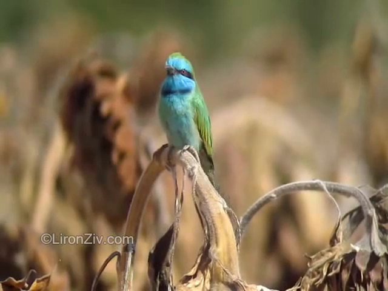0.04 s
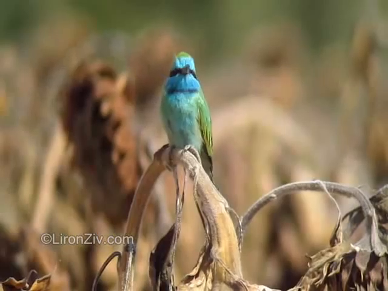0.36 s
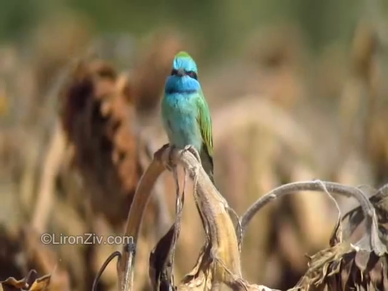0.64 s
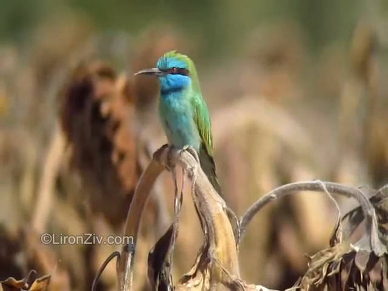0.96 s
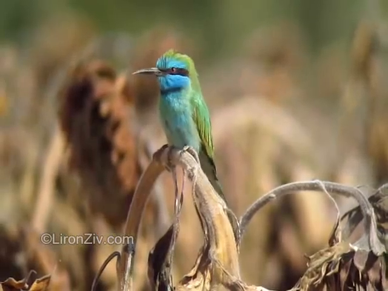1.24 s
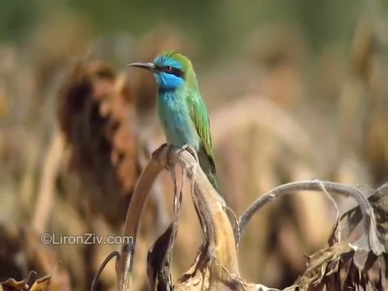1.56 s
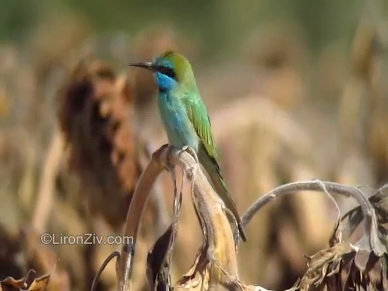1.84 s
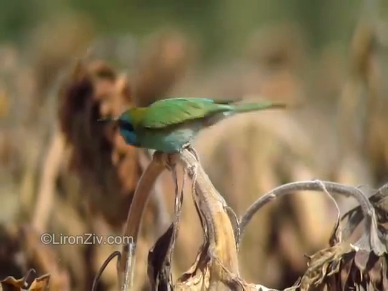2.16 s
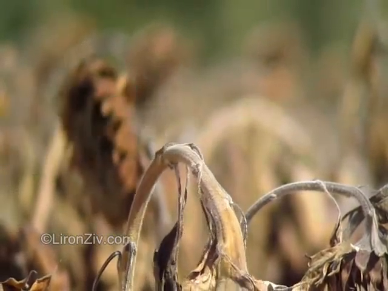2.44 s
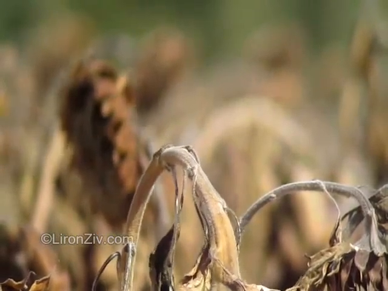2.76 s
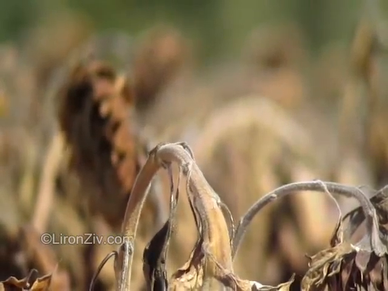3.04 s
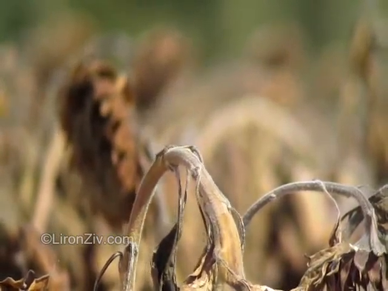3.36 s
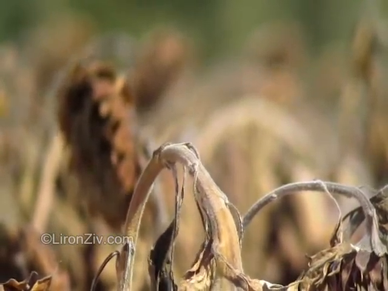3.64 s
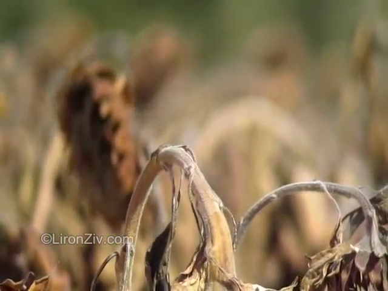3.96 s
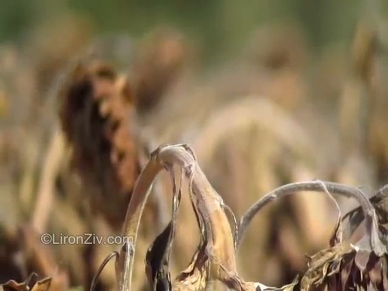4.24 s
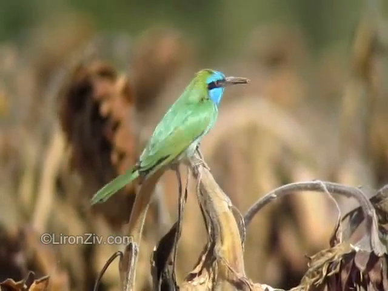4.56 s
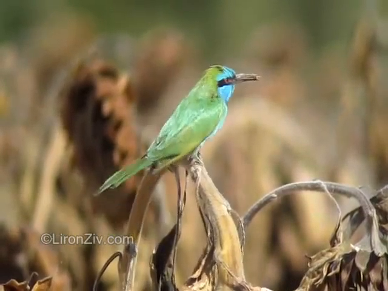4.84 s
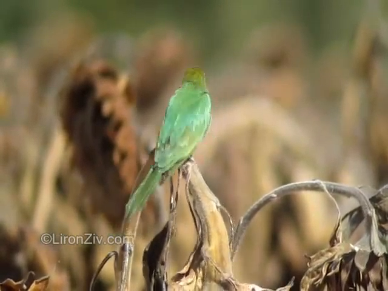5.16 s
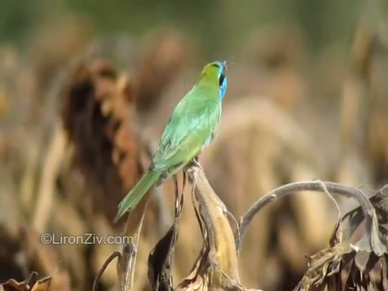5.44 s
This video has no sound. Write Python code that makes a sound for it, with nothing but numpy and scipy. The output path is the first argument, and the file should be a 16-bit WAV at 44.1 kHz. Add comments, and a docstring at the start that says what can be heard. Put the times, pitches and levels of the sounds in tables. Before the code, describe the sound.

Gusty low wind rumble and soft thumps in an open field, with one short bump and three faint small-bird chirps.

```python
"""Gusts of low thumps over a rumble: a breeze in a dry field sweeps eddies across a camera's microphone.
Each eddy is a pressure push and a suction, and the hardest one overloads the input.
A small bird in flight chirps three times and there is one tiny dry tick, both scattered by the stalks.
Behind them lie the broadband hiss of the field and the camera's faint whine."""
import sys
import numpy as np
from scipy import signal
from scipy.fft import rfft, irfft
from scipy.io import wavfile

SR = 44100
rng = np.random.default_rng(int(sys.argv[2]) if len(sys.argv) > 2 else 0)


def unload_wav(signal):
    """Save mono or channel-first audio to the path in sys.argv[1] as 16-bit WAV at rate SR, clipped to [-1, 1]."""
    wavfile.write(
        sys.argv[1],
        SR,
        np.round(np.clip(np.atleast_2d(signal).T, -1, 1) * 32767).astype(np.int16),
    )


N = 242550
TIME = np.arange(N) / SR


def wind(rumble_db=-4.0, rasp_db=-28):
    """Turbulent pressure: rumble and flutter follow the breeze; strong eddies break up into a fine rasp."""
    # the strongest eddies; small fast ones sound higher: (time [s], level [dB], frequency [Hz])
    eddies = [(0.043, -14, 200), (0.133, -9.5, 130), (0.151, -11, 169), (0.16, -6, 187), (0.224, -11, 115),
              (0.296, -16.5, 267), (0.306, -10.5, 149), (0.319, -9.5, 149), (0.3267, 2, 307),
              (0.331, -31, 182), (0.428, -9, 143), (0.515, -4.5, 167), (0.762, -13, 116), (0.922, -13, 115),
              (0.996, -8, 128), (1.059, -8.5, 103), (1.115, -15, 147), (1.241, -14.5, 93),
              (1.284, -10, 150), (1.641, -12, 107), (1.69, -6.5, 122), (1.811, -16, 185),
              (2.095, -3.5, 120), (2.103, -6.5, 129), (2.139, -7, 187), (2.16, -4.5, 247),
              (2.188, -10.5, 163), (2.388, -16, 196), (2.416, -13.5, 181), (2.44, -12.5, 169),
              (2.552, -16.5, 137), (2.743, -19, 115), (3.069, -5, 152), (3.101, -8, 177),
              (3.145, -9.5, 187), (3.22, -7, 135), (3.248, -11.5, 175), (3.637, -22.5, 193),
              (4.178, -7, 139), (4.198, -8, 132), (4.215, -12, 114), (4.59, -2.5, 164), (4.639, -13, 143),
              (4.651, -7, 167), (4.703, -5.5, 182), (4.782, -12, 125), (5.223, -11, 78), (5.314, -10, 217),
              (5.337, -10, 154), (5.388, -11, 210), (5.399, -6, 222), (5.409, -3.5, 216),
              (5.445, -6.5, 160)]
    # spectrum of the slow pressure swell: (frequency [Hz], relative level [dB])
    rumble_spectrum = [(8, -20), (22, -13.5), (42, -4), (70, -12), (120, -19.5), (200, -21.5), (400, -61),
                       (900, -90)]
    # spectrum of the fine turbulence inside an eddy: (frequency [Hz], relative level [dB])
    rasp_spectrum = [(120, -7), (270, 0), (450, -6), (650, -18), (1000, -64), (2000, -80)]
    rumble = amp(breeze(TIME) + rumble_db) * noise(rumble_spectrum)
    low_flutter = flutter(260, level_db=4.5, spread_db=8.5, centre_hz=67.4, quickening=0.4, log_spread=0.4)
    mid_flutter = flutter(150, level_db=2, spread_db=6, centre_hz=113.3, quickening=0.28, log_spread=0.47)
    buffets = thumps(eddies, roundness=3.36) + mid_flutter
    buffet_envelope = abs(signal.hilbert(buffets))
    rasp = amp(rasp_db) * buffet_envelope * noise(rasp_spectrum)
    return rumble + low_flutter + buffets + rasp


def thumps(eddies, roundness, lean_rad=2.27, lean_spread_rad=0.52):
    """A passing eddy is a bipolar pressure pulse, push and suction; a rounder pulse has less treble."""
    out = np.zeros(N)
    t = np.arange(-(SR // 20), SR // 20) / SR
    for (s, db, hz), chance in zip(eddies, rng.standard_normal(len(eddies))):
        swing = (1 - 2j * np.pi * hz * t / roundness) ** -roundness  # about one cycle, with no ring
        lopsided = np.exp(1j * (lean_rad + lean_spread_rad * chance))  # the suction is mostly the deeper
        add(out, s + t[0], amp(db) * (swing * lopsided).real)
    return out


def flutter(count, level_db, spread_db, centre_hz, quickening, log_spread):
    """Convection of random eddies: a stronger breeze makes their pulses both louder and quicker."""
    jitter, strength, pace = rng.uniform(-1.01, 1, (count, 3)).T
    times = (np.arange(count) + .5 + jitter / 2) * TIME[-1] / count
    breeze_db = breeze(times)
    db = breeze_db + level_db + spread_db * strength
    hz = centre_hz * amp(quickening * (breeze_db - breeze_db.mean())) * np.exp(log_spread * pace)
    return thumps(np.transpose([times, db, hz]), roundness=3.3)


def breeze(times, build_db_per_s=416, die_db_per_s=360, calm_db=-42.5):
    """Level of the breeze in dB: gusts build, hold and die away, adding in power to nearly calm air."""
    # gusts at the microphone: (time [s], duration [s], level [dB])
    gusts = [(0.0, 0.18, -25), (0.278, 0.35, -26), (0.877, 0.3, -29), (1.237, 0.21, -32.5),
             (1.668, 0.44, -28), (2.076, 0.092, -22.5), (2.365, 0.12, -22.5), (2.648, 0.51, -34),
             (3.068, 0.23, -22), (3.446, 0.17, -27.5), (3.826, 0.032, -30), (4.083, 0.64, -32.5),
             (4.18, 0.046, -21), (4.524, 0.26, -25.5), (5.006, 0.1, -30), (5.124, 0.38, -25)]
    power = amp(calm_db) ** 2
    for start, length, db in gusts:
        before_db = build_db_per_s * np.maximum(start - times, 0)
        after_db = die_db_per_s * np.maximum(times - start - length, 0)
        power = power + amp(db - before_db - after_db) ** 2
    return 10 * np.log10(power)


def bird(gain_db=0.5, warble_depth_hz=170, warble_rate_hz=190, voice_split_hz=3100, fade_db=-6.5):
    """Two voices whistle quick glides; fast frequency modulation makes the lower one rasp."""
    # whistled notes: (time [s], duration [s], first pitch [Hz], last pitch [Hz], relative level [dB])
    notes = [(3.967, 0.0068, 4460, 4300, -30), (3.962, 0.015, 2740, 2620, -41),
             (3.977, 0.0102, 2770, 2730, -32.5), (4.358, 0.028, 2250, 2350, -45),
             (4.376, .018, 2650, 2820, -41), (4.384, .029, 4310, 3180, -41),
             (4.902, 0.018, 2500, 2950, -45), (4.909, 0.011, 4250, 3880, -48)]
    out = np.zeros(N)
    for start, length, first_hz, last_hz, db in notes:
        t = np.arange(0, length, 1 / SR)
        glide_hz = first_hz + (last_hz - first_hz) * t / length
        depth_hz = warble_depth_hz if first_hz < voice_split_hz else 0
        warble_hz = depth_hz * np.sin(2 * np.pi * (warble_rate_hz * t + rng.random()))
        cycles = np.cumsum(glide_hz + warble_hz) / SR
        envelope = signal.windows.tukey(len(t), alpha=.25) * amp(fade_db * t / length)
        add(out, start, amp(db + gain_db) * envelope * np.sin(2 * np.pi * cycles))
    return out


def tick(decay_s=0.00055):
    """A broadband transient: bright noise decays exponentially within a few milliseconds."""
    # the dry snap: (time [s], initial level [dB])
    snaps = [(5.1824, -30.5)]
    # spectrum of the snap: (frequency [Hz], relative level [dB])
    spectrum = [(1000, 14), (2700, 18), (4000, 20), (5200, 21), (8000, -6), (15000, 10)]
    out = np.zeros(N)
    t = np.arange(SR // 50) / SR
    for s, db in snaps:
        add(out, s, amp(db) * noise(spectrum)[:len(t)] * np.exp(-t / decay_s))
    return out


def scatter(direct, wet_db=-15, t60_s=.15):
    """Diffuse scattering: reflections from the stalks add a short, weak tail to the direct sound."""
    t = np.arange(SR // 3) / SR
    tail = rng.standard_normal(len(t)) * amp(-60 * t / t60_s)
    return direct + amp(wet_db) * signal.fftconvolve(direct, tail / np.linalg.norm(tail))[:N]


def field(gain_db=10.0, flicker_db=0.36):
    """Amplitude-modulated noise: the far hiss of the field drifts slowly and flickers slightly."""
    # spectrum of the open field: (frequency [Hz], relative level [dB])
    spectrum = [(20, 6.5), (130, 6.5), (300, 4.5), (450, 2), (680, 0), (930, 0), (1350, -4), (2800, -7.5),
                (5000, -11), (6900, -12), (7700, -15), (11000, -18.5), (15000, -24.5)]
    # drift of the hiss: (time [s], relative level [dB])
    drift = [(0, -57), (0.4, -56.5), (0.7, -54.5), (1.5, -53.5), (2.5, -55.5), (2.9, -53), (3.3, -55.5),
             (4.05, -53.5), (4.7, -55.5), (5.1, -54), (5.5, -56.5)]
    drift_db = np.interp(TIME, *np.transpose(drift))
    return amp(drift_db + gain_db + flicker_db * wander(rate_hz=16)) * noise(spectrum)


def whine(waver_rad=0.98):
    """Slow phase modulation makes the camera's thin pure tones waver slightly."""
    # tones of the camera: (frequency [Hz], rms level [dB])
    tones = [(1207, -66.5), (1704, -68.5), (6306.5, -73.5), (6803, -75)]
    out = np.zeros(N)
    for hz, db in tones:
        phase = 2 * np.pi * hz * TIME + waver_rad * wander(rate_hz=2.4)
        out += amp(db) * np.sqrt(2) * np.sin(phase)
    return out


def noise(spectrum):
    """Spectral shaping of white noise by rows (frequency [Hz], relative level [dB]), at rms 1."""
    hz, db = np.transpose(spectrum)
    bins = np.fft.rfftfreq(N, 1 / SR)
    gain = amp(np.interp(np.log(bins + 1), np.log(hz), db))
    return unit(irfft(rfft(rng.standard_normal(N)) * gain, N))


def wander(rate_hz):
    """Low-passed noise of rms 1: a smooth random fluctuation at about the given rate."""
    bins = np.fft.rfftfreq(N, 1 / SR)
    gain = np.exp(-(bins / rate_hz) ** 2)
    return unit(irfft(rfft(rng.standard_normal(N)) * gain, N))


def add(mix, s, sound):
    """Superposes a sound from time s, dropping what falls outside the mix."""
    start = round(s * SR)
    sound = sound[max(-start, 0):]
    part = mix[max(start, 0):][:len(sound)]
    part += sound[:len(part)]


def amp(db):
    """Decibels to amplitude ratio."""
    return 10 ** (np.asarray(db) / 20)


def unit(x):
    """Normalises to rms 1."""
    return x / np.sqrt(np.mean(x ** 2) + 1e-20)


def scene():
    """Superposition: the pressures of all sources add at one microphone."""
    return (wind() + field() + whine() + scatter(bird() + tick()))[None]


def record(dry, full_scale=.675, cutoff_hz=15480):
    """Overload flattens any peak beyond full scale; a low-pass filter then limits the bandwidth."""
    clipped = np.clip(dry, -full_scale, full_scale)
    lowpass = signal.firwin(601, cutoff_hz, window=("kaiser", 9), fs=SR)
    return signal.oaconvolve(clipped, lowpass[None], "same")


dry = scene()
out = record(dry)
unload_wav(out)
```